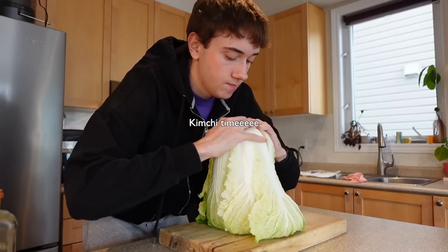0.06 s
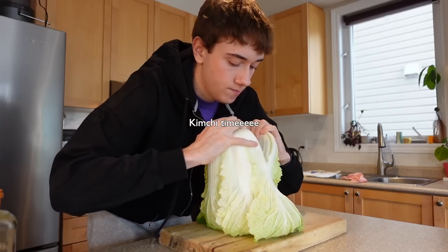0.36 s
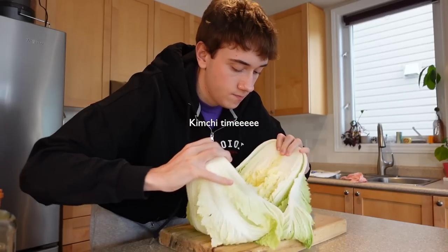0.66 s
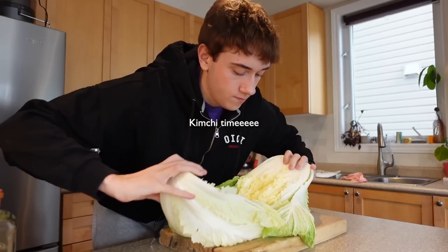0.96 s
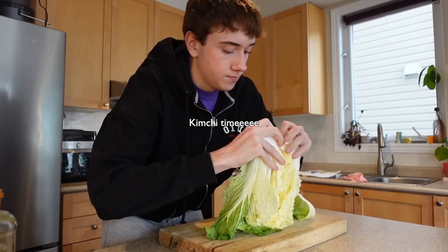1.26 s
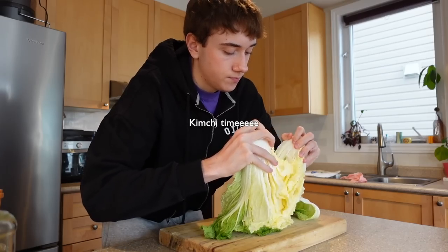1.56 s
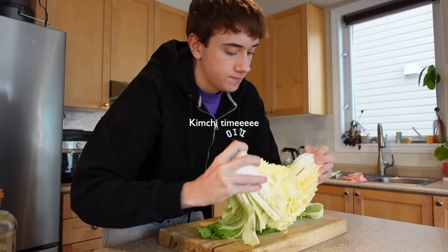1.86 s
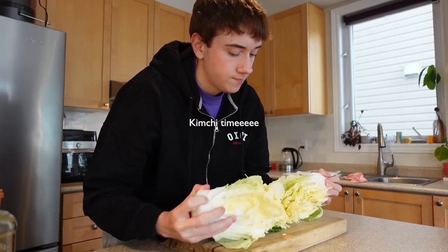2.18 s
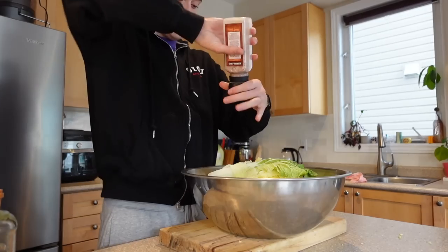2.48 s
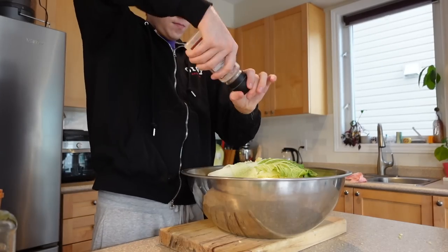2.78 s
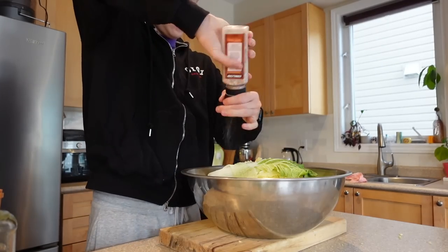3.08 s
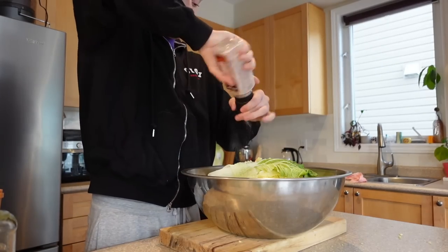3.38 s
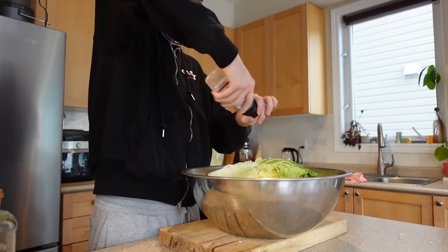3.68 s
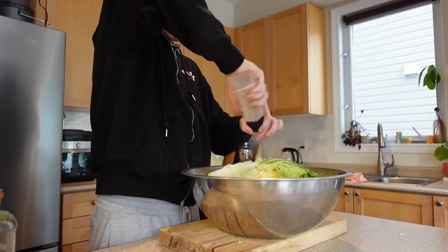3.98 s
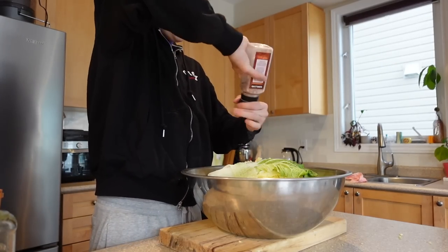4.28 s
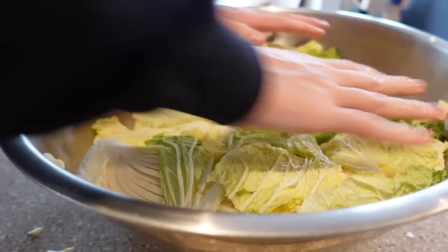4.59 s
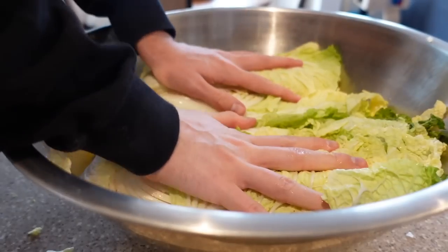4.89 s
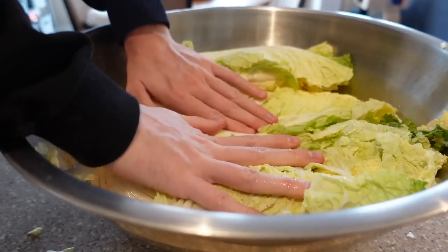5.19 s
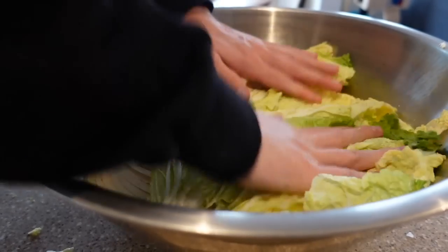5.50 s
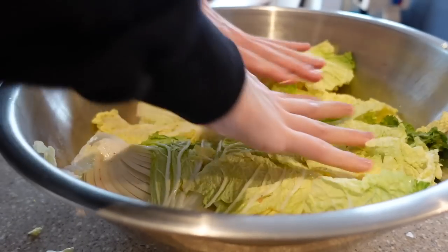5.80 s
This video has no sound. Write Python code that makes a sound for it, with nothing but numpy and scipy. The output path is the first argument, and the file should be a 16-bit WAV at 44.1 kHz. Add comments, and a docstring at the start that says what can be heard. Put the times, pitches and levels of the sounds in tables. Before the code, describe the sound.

From the start, a head of cabbage is pulled apart with crisp crackles and dull pops from the core, strongest around 0.5 seconds. The cutting board groans faintly beneath it until about 1.1 seconds. A sharp snap at 1.2 seconds leads into more crunchy tearing and leaf rustle, with a tiny squeak near 1.8 seconds. At 2.4 seconds a salt mill starts, louder and brighter, twisting back and forth about five strokes a second as crystals crack and crumble. It stops at 4.6 seconds, and hands at once press wet leaves down in quieter squelches and small snaps until about 6 seconds. The full steel bowl thumps dully on the counter several times, most clearly near 4.8, 5.2 and 5.6 seconds. Everything is close and centred, in a small kitchen with slight reflections and a faint low hum.

```python
"""Cabbage and salt in a small kitchen

A head of cabbage is torn in two: the core cracks, then the crisp ribs part. A salt mill is twisted
back and forth, crushing crystals over a steel bowl. Both hands then press the wet leaves down, and
the bowl thumps softly on the counter. Each crunch is a stream of tiny breaks, with a few loud ones."""
import sys
import numpy as np
from scipy import signal
from scipy.fft import rfft, irfft, next_fast_len
from scipy.io import wavfile
from scipy.ndimage import uniform_filter1d

SR = 44100
rng = np.random.default_rng(int(sys.argv[2]) if len(sys.argv) > 2 else 0)


def generate_wav(signal):
    """Clip the signal to [-1, 1] and save it as 16-bit WAV at the path in sys.argv[1]."""
    frames = np.transpose(np.atleast_2d(signal))
    scaled = np.clip(frames, -1, 1) * 32767
    pcm = np.round(scaled).astype(np.int16)
    wavfile.write(sys.argv[1], SR, pcm)


N = 266805
TIME = np.arange(N) / SR


def from_db(db):
    """Decibels to gain."""
    return 10 ** (np.asarray(db) / 20)


def unit_rms(x):
    """Scale to rms 1."""
    return x / np.sqrt(np.mean(x ** 2) + 1e-20)


def low_pass(x, hz, order=2):
    """Butterworth treble cut."""
    return signal.sosfilt(signal.butter(order, min(hz, SR / 2 - 1), fs=SR, output="sos"), x)


def high_pass(x, hz, order=2):
    """Butterworth bass cut."""
    return signal.sosfilt(signal.butter(order, hz, "high", fs=SR, output="sos"), x)


def colour(x, spectrum, size=2048):
    """Minimum-phase filter of unit energy; the spectrum sets shape only."""
    hz, db = np.transpose(spectrum)
    grid_hz = np.maximum(np.arange(size // 2 + 1) * SR / size, 1)
    magnitude = from_db(np.interp(np.log(grid_hz), np.log(hz), db))
    cepstrum = irfft(np.log(magnitude))
    cepstrum[1:size // 2] *= 2
    cepstrum[size // 2 + 1:] = 0
    response = irfft(np.exp(rfft(cepstrum)))
    return signal.oaconvolve(x, response / np.linalg.norm(response))[:len(x)]


def place(out, start_s, sound, peak_db):
    """Mix a sound in at the given time and peak."""
    start = max(round(start_s * SR), 0)
    span = out[start:start + len(sound)]
    span += from_db(peak_db) * sound[:len(span)] / np.abs(sound).max()


def gain_curve(points):
    """Gain through (time_s, level_db) points, closing within 5 ms outside them."""
    time_s, level_db = np.transpose(points)
    gate = np.interp(TIME, [time_s[0] - .005, time_s[0], time_s[-1], time_s[-1] + .005], [0, 1, 1, 0])
    return gate * from_db(np.interp(TIME, time_s, level_db))


def efforts(moves, drift_db_per_s, release_db_per_s, size=SR):
    """Hand moves build, drift and die away; one gain curve per level column."""
    power, age_s = np.zeros((3, N + size)), TIME[:size]
    for start_s, rise_s, length_s, *levels_db in moves:
        change_db = drift_db_per_s * age_s - release_db_per_s * np.maximum(age_s - length_s, 0)
        envelope = np.minimum(age_s / rise_s, 1) * from_db(change_db)
        start = max(round(start_s * SR), 0)
        power[:, start:start + size] += np.outer(from_db(levels_db), envelope) ** 2
    return np.sqrt(power[:, :N])


def crackle(gain, spectrum, per_s, spread_db, fray_t60_s, ring_hz, ring_gain, pitches=14, size=600):
    """Tiny breaks of uneven size; each clicks, frays and rings briefly at a pitch within ring_hz."""
    first, last = np.flatnonzero(gain)[[0, -1]]
    length, t = last - first, TIME[:size]
    clicks, rings = np.zeros((2, length))
    for hz in np.geomspace(*ring_hz, pitches):
        count = rng.poisson(per_s * length / SR / pitches)
        size_db = spread_db * np.minimum(rng.exponential(1, count), 4)
        strength = from_db(size_db) * rng.choice([-1, 1], count)
        train = np.bincount(rng.integers(0, length, count), strength, length)
        ring = np.sin(2 * np.pi * hz * t) * from_db(-60 * t * hz / 14)  # t60 of 14 cycles
        clicks += train
        rings += signal.oaconvolve(train, ring / np.linalg.norm(ring))[:length]
    fray_power = signal.lfilter([1], [1, -from_db(-120 / (fray_t60_s * SR))], clicks ** 2 + 1e-18)
    fraying = np.sqrt(fray_power) * rng.standard_normal(length)
    stream = 0.91 * unit_rms(clicks) + unit_rms(fraying) + ring_gain * unit_rms(rings)
    stream = unit_rms(colour(stream, spectrum))
    # even out the loudness so that it swells and fades with the gain
    stream /= np.sqrt(uniform_filter1d(stream ** 2, size) + .02)
    return gain * np.pad(stream, (first, N - last))


def avalanches(per_s, fade_s, floor):
    """One break sets off its neighbours: activity jumps, then dies back; a gain near 1."""
    triggers = (rng.random(N) < per_s / SR) * rng.uniform(0.57, 1, N)
    energy = signal.lfilter([1], [1, -np.exp(-1 / (fade_s * SR))], triggers)
    energy = energy / energy.mean() + floor
    return np.sqrt(energy / uniform_filter1d(energy, size=1500))


def fracture(t60_s, ragged, size):
    """A sharp release and a ragged tail as the crack runs out; unit energy."""
    burst = ragged * rng.standard_normal(size) * from_db(-60 * TIME[:size] / t60_s)
    burst[0] = 1
    return burst / np.linalg.norm(burst)


def big_breaks(breaks, crack_spectrum, splinter_spectrum, body_spectrum, splinter_db, crumble_db):
    """Single loud breaks: bright crack, splinters, ringing shard and the knock of the body."""
    snap_t60_s, crumble_t60_s, shard_t60_s = .012, .045, .03
    size = 3000
    out, t = np.zeros(N), TIME[:size]
    fade = from_db(-60 * t / snap_t60_s) + from_db(crumble_db - 60 * t / crumble_t60_s)
    for start_s, peak_db, body_db in breaks:
        crack_noise, splinter_noise = fade * rng.laplace(size=(2, size))
        crack = unit_rms(colour(crack_noise, crack_spectrum))
        splinters = from_db(splinter_db) * unit_rms(colour(splinter_noise, splinter_spectrum))
        shard_hz = rng.uniform(2100, 3600)
        ring = np.sin(2 * np.pi * shard_hz * t) * from_db(-60 * t / shard_t60_s)
        shard = from_db(-6) * unit_rms(ring)
        jolt = fracture(snap_t60_s, ragged=0.37, size=size)
        knock = from_db(body_db) * unit_rms(colour(jolt, body_spectrum))
        place(out, start_s, crack + splinters + shard + knock, peak_db)
    return out


# kitchen background: freq_hz, density_db
HUM_SPECTRUM = [(25, -25), (55, -3), (85, -28), (120, 4.5), (170, -6), (220, 2.5), (330, -4.5), (600, -3.5),
                (1200, -19.5), (4000, -16.5), (16000, -24)]


def kitchen_hum(level_db):
    """Steady low room noise."""
    return from_db(level_db) * unit_rms(colour(rng.standard_normal(N), HUM_SPECTRUM))


# pulls that open the split: start_s, rise_s, length_s, core_db, ribs_db, leaves_db
CABBAGE_PULLS = [(0.0, 0.023, 0.068, -40, -42.5, -42), (0.125, 0.015, .05, -38, -40.5, -39),
                 (0.165, 0.039, 0.085, -31, -31, -34.5), (0.235, 0.031, 0.045, -28.5, -32, -31.5),
                 (0.30, 0.016, .055, -41, -37.5, -40.5), (0.433, .006, .04, -38, -38, -39),
                 (0.472, 0.035, 0.064, -20.5, -28, -32.5), (0.55, 0.028, 0.1, -27, -28, -46),
                 (0.69, 0.021, 0.14, -38.5, -34, -30), (0.85, 0.032, 0.19, -40.5, -34.5, -52),
                 (1.075, 0.015, 0.076, -61, -34.5, -36.5), (1.235, 0.033, 0.14, -62, -29.5, -30),
                 (1.295, 0.051, 0.15, -41.5, -26, -36), (1.555, 0.063, 0.33, -42.5, -30, -34),
                 (1.81, 0.06, .19, -42, -26.5, -32.5), (2.01, .04, .21, -44.5, -31, -36.5),
                 (2.23, 0.018, 0.18, -50, -36, -38)]
# breaking core, ribs and thin leaves: freq_hz, density_db
CORE_SPECTRUM = [(70, -39), (130, -6.5), (215, -1.5), (320, -0.5), (500, 3.5), (720, 4), (1000, -6.5),
                 (1700, 4.5), (4000, -61)]
RIB_SPECTRUM = [(250, -48), (600, -8.5), (1000, -1), (1500, -5.5), (2150, 0), (2900, 0), (4500, -2.5),
                (7000, -4.5), (10000, -9), (16000, -12)]
LEAF_SPECTRUM = [(2500, -54), (5500, -5.5), (8000, 0.5), (10000, -0.5), (13000, -5), (16000, 1.5)]


def tearing(spread_db=3.2):
    """The thick core gives way in dull pops, ribs crackle and thin leaves brush apart."""
    core, ribs, leaves = efforts(CABBAGE_PULLS, drift_db_per_s=-12.5, release_db_per_s=180)
    pops = crackle(core, CORE_SPECTRUM, per_s=400, spread_db=spread_db,
                   fray_t60_s=0.0016, ring_hz=(358, 860), ring_gain=0.43)
    crunch = crackle(ribs, RIB_SPECTRUM, per_s=1900, spread_db=spread_db,
                     fray_t60_s=0.045, ring_hz=(930, 6800), ring_gain=0.82)
    rustle = crackle(leaves, LEAF_SPECTRUM, per_s=2300, spread_db=spread_db,
                     fray_t60_s=0.0092, ring_hz=(6950, 14900), ring_gain=1.0)
    tear = pops + from_db(1) * crunch + from_db(-2.5) * rustle
    return tear * avalanches(per_s=70, fade_s=0.014, floor=0.9)


# single ribs breaking: start_s, peak_db, core_vs_crack_db
RIB_BREAKS = [(0.022, -26, 2), (0.130, -22, -8), (0.183, -15.5, -2), (0.343, -16.5, 8), (0.437, -19, 6),
              (0.512, -14, 3), (0.647, -16, 8), (0.745, -18, -15), (0.827, -21, -15), (1.213, -10, -12),
              (1.256, -14, -8), (1.298, -17, -12), (1.314, -15, -12), (1.455, -17, -12), (1.842, -16, -12),
              (1.963, -17, -12), (2.067, -17, -12), (2.158, -17, -10), (4.689, -16, -6), (4.714, -17, -12),
              (4.914, -20, -15), (5.089, -25, -15), (5.196, -15, -1), (5.540, -18, -8), (5.809, -22, -15),
              (5.996, -13, -8)]


def rib_snaps():
    """Ribs snap under pulling or pressing, each with a dull knock of the core."""
    return big_breaks(RIB_BREAKS, RIB_SPECTRUM, LEAF_SPECTRUM, CORE_SPECTRUM,
                      splinter_db=-5, crumble_db=-42)


# drag on the cutting board: time_s, level_db
BOARD_DRAG = [(0.46, -39), (0.6, -39), (0.8, -37), (1.05, -44), (1.13, -50)]
# board resonance: freq_hz, density_db
BOARD_SPECTRUM = [(120, -20), (185, -28), (218, 1.5), (255, -24), (400, -25)]


def board_groan():
    """The cutting board groans as the halves drag over it."""
    return gain_curve(BOARD_DRAG) * unit_rms(colour(rng.standard_normal(N), BOARD_SPECTRUM))


# wet leaf sliding on leaf: start_s, length_s, start_pitch_hz, peak_db
LEAF_SLIPS = [(1.832, 0.03, 3540, -25), (5.114, 0.03, 1930, -37)]


def leaf_squeaks(rise_hz_per_s=12000, jitter=0.047):
    """Brief, unsteady stick-slip tones that rise as the leaves slide faster."""
    out = np.zeros(N)
    for start_s, length_s, start_pitch_hz, peak_db in LEAF_SLIPS:
        t = TIME[:int(length_s * SR)]
        waver = unit_rms(low_pass(rng.standard_normal(N), hz=500))[:len(t)]
        pitch_hz = (start_pitch_hz + rise_hz_per_s * t) * (1 + jitter * waver)
        tone = np.sin(2 * np.pi * np.cumsum(pitch_hz) / SR)
        place(out, start_s, np.sin(np.pi * t / length_s) * tone, peak_db)
    return out


# forward strokes load the burr, return strokes mostly shed grit:
# start_s, rise_s, length_s, burr_db, crush_db, grit_db
MILL_STROKES = [(2.427, 0.014, 0.1, -47, -22, -22.5), (2.714, .012, 0.077, -22, -20.5, -28),
                (2.922, .012, 0.11, -40, -26, -31), (3.16, 0.0092, 0.076, -22.5, -21.5, -26.5),
                (3.355, 0.018, 0.041, -32.5, -45, -26), (3.553, 0.027, 0.079, -22, -23, -26),
                (3.672, .012, 0.025, -41, -21.5, -24), (3.768, .008, 0.071, -32, -29.5, -25),
                (3.958, 0.01, 0.13, -27, -24.5, -33.5), (4.204, 0.011, 0.045, -28, -27.5, -31),
                (4.402, 0.0099, 0.12, -23, -22.5, -48), (4.53, 0.0091, 0.016, -42, -22.5, -27)]
# steady pressure, crumbling salt between strokes: time_s, crush_db
STEADY_PRESSURE = [(2.43, -37), (2.70, -41.5), (2.80, -25.5), (3.50, -24.5), (3.80, -29), (3.93, -29.5),
                   (4.17, -30.5), (4.29, -26), (4.612, -30)]


def mill_effort(stop_s=4.612, fade_s=.008):
    """Strokes ride on steady pressure until the mill stops; gains of burr, crushing and grit."""
    strokes = efforts(MILL_STROKES, drift_db_per_s=9, release_db_per_s=240)
    steady = np.outer(from_db([-10.5, 0, -8.5]), gain_curve(STEADY_PRESSURE))
    return np.hypot(strokes, steady) * np.clip(1 - (TIME - stop_s) / fade_s, 0, 1)


# big crystals bursting in the burr: start_s, peak_db, mill_vs_crack_db
CRYSTAL_BURSTS = [(2.433, -9, -15), (2.439, -5, -17), (2.454, -7, -15), (2.516, -4, -10), (2.717, -8, 5),
                  (2.733, -7, 2), (2.788, -9, 2), (2.899, -13, -10), (2.926, -9, 3), (2.964, -6, -8),
                  (2.974, -8, -15), (3.030, -5, 1), (3.171, -2, 9), (3.192, -6, 2), (3.207, -6, -5),
                  (3.374, -7, -10), (3.381, -5, -14), (3.552, -11, -4), (3.687, -6, -8), (3.771, -5, -12),
                  (3.781, -8, -12), (3.966, -9, 3), (4.049, -9, -4), (4.074, -6, -10), (4.213, -3, -12),
                  (4.256, -12, -3), (4.412, -8, 2), (4.440, -5, 0), (4.457, -5, 2), (4.515, -8, 2)]
# mill body, crushed salt and fine grit: freq_hz, density_db
MILL_SPECTRUM = [(150, -28), (350, -18), (600, -13), (800, -5), (1080, 1), (1300, -3), (1650, -8),
                 (2400, -16), (5000, -35)]
SALT_SPECTRUM = [(400, -16.5), (1000, -3), (1750, -1.5), (2250, 2.5), (2600, 0.5), (2950, 3), (4200, 1.5),
                 (5600, 1.5), (7500, -0.5), (10000, -5), (16000, -12)]
GRIT_SPECTRUM = [(3000, -14), (6000, -2.5), (8200, -2.5), (10500, -5), (13000, -7.5), (16000, -5)]


def grinding(spread_db=3.4):
    """The burr knocks the hollow mill while crystals burst and crumble to grit."""
    burr, crush, grit = mill_effort()
    knocks = crackle(burr, MILL_SPECTRUM, per_s=520, spread_db=spread_db,
                     fray_t60_s=0.03, ring_hz=(1010, 1200), ring_gain=0.043)
    crunch = crackle(crush, SALT_SPECTRUM, per_s=2400, spread_db=spread_db,
                     fray_t60_s=0.036, ring_hz=(1970, 5630), ring_gain=0.6)
    fizz = crackle(grit, GRIT_SPECTRUM, per_s=3500, spread_db=spread_db,
                   fray_t60_s=0.011, ring_hz=(7100, 14900), ring_gain=1.0)
    bursts = big_breaks(CRYSTAL_BURSTS, SALT_SPECTRUM, GRIT_SPECTRUM, MILL_SPECTRUM,
                        splinter_db=0.5, crumble_db=4)
    grind = (knocks + crunch + from_db(0.5) * fizz) * avalanches(per_s=70, fade_s=0.0078, floor=5.0)
    return high_pass(grind + bursts, hz=122)


# presses on the heap: start_s, rise_s, length_s, palms_db, wet_db, leaves_db
HAND_PRESSES = [(4.612, 0.0092, 0.04, -37, -74, -63), (4.68, 0.0098, 0.046, -35, -33, -34.5),
                (4.745, 0.039, 0.052, -23.5, -28.5, -35), (4.84, 0.0099, 0.031, -52, -37, -46),
                (4.91, 0.047, 0.099, -39.5, -35, -39), (5.08, 0.0084, 0.052, -50, -45, -36.5),
                (5.125, 0.015, 0.064, -39, -36.5, -39), (5.192, 0.0033, 0.0093, -25.5, -35, -39),
                (5.235, 0.036, .16, -44.5, -45.5, -46.5), (5.52, .02, .027, -36, -34, -38),
                (5.57, 0.023, 0.062, -33, -38.5, -42.5), (5.69, 0.099, 0.11, -40.5, -38, -38),
                (5.83, .01, 0.051, -35.5, -70, -67), (5.915, 0.022, 0.064, -33.5, -43.5, -47),
                (5.987, 0.0066, 0.011, -31.5, -32, -55), (6.03, .01, .02, -48, -37.5, -39)]
# wet leaves and kneading palms: freq_hz, density_db
SQUELCH_SPECTRUM = [(300, -12), (700, -2), (1200, 4.5), (2100, 3), (3200, 2), (5000, 3.5), (7000, -0.5),
                    (10000, -12.5), (16000, -17)]
PALM_SPECTRUM = [(30, -8), (65, -23), (110, -1), (160, -3), (215, -1), (300, 0), (390, -2), (520, -6),
                 (900, -10.5), (2000, -64)]


def pressing(spread_db=3.2):
    """Palms knead the heap; wet leaves squeeze and slip over one another in spurts."""
    palms, wet, leaves = efforts(HAND_PRESSES, drift_db_per_s=-13, release_db_per_s=290)
    squelch = crackle(wet, SQUELCH_SPECTRUM, per_s=1300, spread_db=spread_db,
                      fray_t60_s=0.042, ring_hz=(1100, 6350), ring_gain=0.35)
    rustle = crackle(leaves, LEAF_SPECTRUM, per_s=2100, spread_db=spread_db,
                     fray_t60_s=0.0097, ring_hz=(7000, 15000), ring_gain=0.45)
    kneading = crackle(palms, PALM_SPECTRUM, per_s=320, spread_db=-1.5,
                       fray_t60_s=0.015, ring_hz=(202, 430), ring_gain=0.059)
    spurts = avalanches(per_s=61, fade_s=0.0092, floor=0.68)
    return (from_db(3) * squelch + from_db(0.7) * rustle) * spurts + from_db(-1.5) * kneading


# shoves that seat the bowl on the counter: start_s, peak_db, pitch_hz, cutoff_hz
BOWL_SHOVES = [(4.615, -20.5, 170, 400), (4.779, -14.5, 195, 704), (4.793, -31, 150, 500),
               (5.163, -13, 360, 1500), (5.207, -9.5, 139, 796), (5.556, -8, 257, 607),
               (5.596, -35, 250, 500), (5.834, -19, 275, 1400), (5.874, -21.5, 230, 1300),
               (5.952, -19, 304, 1400)]
# modes of the full bowl, damped by leaves: freq_hz, level_db, t60_s
BOWL_MODES = [(114, -3.5, 0.073), (157, -1, 0.05), (210, -3.5, 0.091), (256, -3.5, 0.058),
              (375.5, -2.5, 0.075), (487, -6.5, 0.044), (610, -1, 0.054), (675, -1.5, 0.08),
              (1050, -6, .05), (1390, -4, .05), (1790, -13, .04)]


def bowl_thumps(slap_db=4, slap_t60_s=0.062, off_pitch_db=-10, size=12000):
    """Each shove rings mainly the modes near its pitch, under a slap, with its own brightness."""
    out, t = np.zeros(N), TIME[:size]
    mode_hz, mode_db, t60_s = np.transpose(BOWL_MODES)[:, :, None]
    for start_s, peak_db, pitch_hz, cutoff_hz in BOWL_SHOVES:
        distance_oct = np.minimum(np.abs(np.log2(mode_hz / pitch_hz)), 1)
        strength_db = mode_db + off_pitch_db * distance_oct + rng.normal(0, 1, mode_hz.shape)
        rings = from_db(strength_db - 60 * t / t60_s) * np.sin(2 * np.pi * mode_hz * t)
        slap = from_db(slap_db - 60 * t / slap_t60_s) * rng.standard_normal(size)
        thump = low_pass(rings.sum(0) + slap, cutoff_hz)
        # a small bowl radiates almost nothing below its lowest mode
        place(out, start_s, high_pass(thump, hz=99, order=4), peak_db)
    return out


def reflections(x, level_db=-17, t60_s=0.28, delay_s=.004, size=20000):
    """Diffuse reflections from cupboards and tiles."""
    t = TIME[:size]
    tail = low_pass(rng.standard_normal(size), hz=4950, order=1)
    tail *= from_db(-60 * t / t60_s) * (t > delay_s)
    return from_db(level_db) * signal.oaconvolve(x, tail / np.linalg.norm(tail))[:N]


def stereo_ports(x, side_db=-12.5, phase_rad=1.77, low_hz=90, high_hz=820):
    """Two microphone ports hear the bass slightly out of step, and dull reflections in antiphase."""
    size = next_fast_len(N)
    hz = np.arange(size // 2 + 1) * SR / size
    band = hz / (hz + low_hz) / np.sqrt(1 + (hz / high_hz) ** 6)
    side = irfft(rfft(x, size) * band * from_db(side_db) * np.exp(-1j * phase_rad), size)[:N]
    side += from_db(-30) * low_pass(reflections(x), hz=3250, order=1)
    return np.array([x + side, x - side])


def scene():
    """All sources close by and straight ahead, in the hum of the kitchen."""
    cabbage = rib_snaps() + tearing() + board_groan()
    close = cabbage + grinding() + pressing() + leaf_squeaks() + bowl_thumps()
    hum = kitchen_hum(level_db=-47)
    return stereo_ports(close + reflections(close) + hum)


def record(dry):
    """Deep bass roll-off and a steep top cut."""
    top_cut = signal.ellip(12, .1, 80, 15900, fs=SR, output="sos")
    return signal.sosfilt(top_cut, high_pass(dry, hz=80, order=3))


dry = scene()
out = record(dry)
generate_wav(out)
```